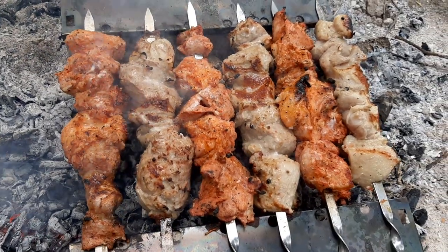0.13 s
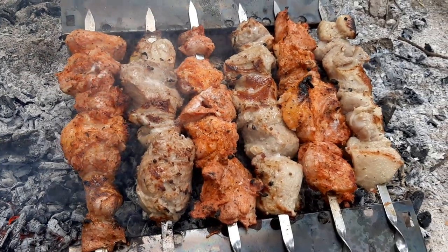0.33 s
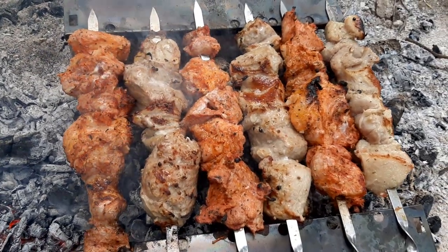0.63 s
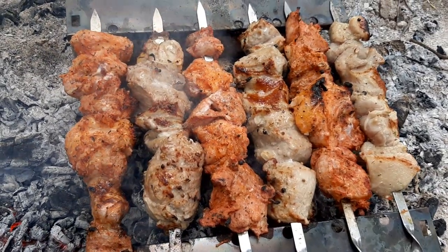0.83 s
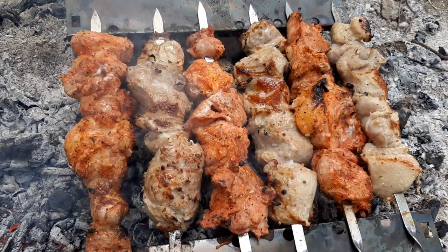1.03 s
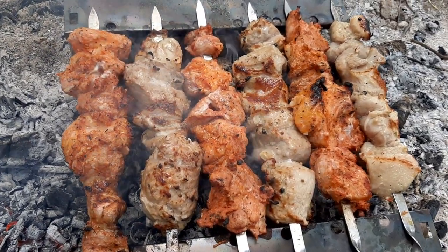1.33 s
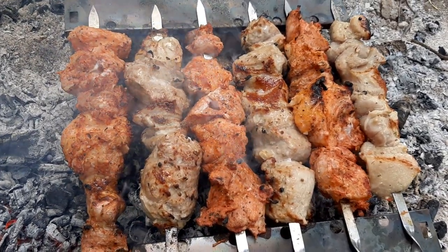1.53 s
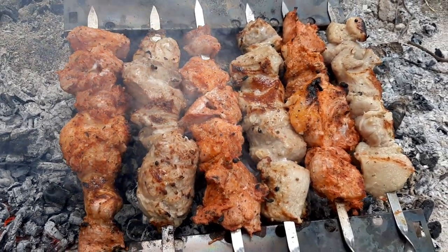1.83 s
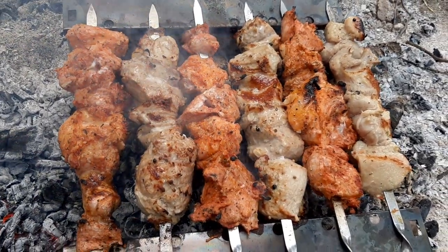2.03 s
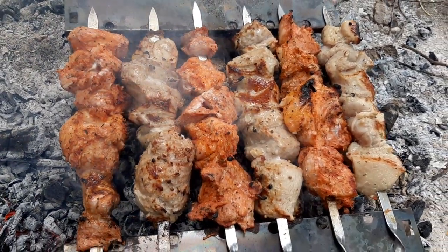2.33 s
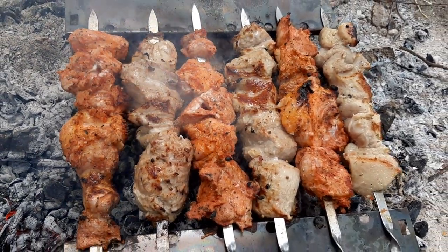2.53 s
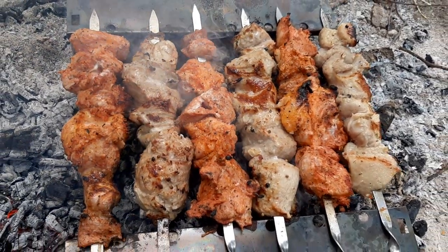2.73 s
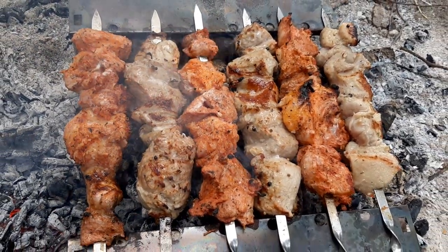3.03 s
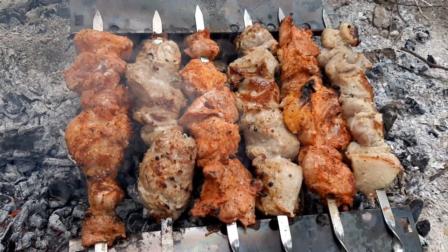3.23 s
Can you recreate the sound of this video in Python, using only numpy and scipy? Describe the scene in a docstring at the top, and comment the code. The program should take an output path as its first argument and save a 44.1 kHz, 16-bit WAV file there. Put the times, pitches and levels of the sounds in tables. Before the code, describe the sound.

A bright, fizzing sizzle of meat on a charcoal grill, dotted with sharp crackles.

```python
"""A bright, fizzing sizzle over a lower frying crackle: meat skewers on a charcoal grill outdoors.
Tiny fat bubbles burst at many spots, each with a click, and swell into a rush as juice meets the embers.
Droplets spit, coals snap, and drips land with a soft plop and boil off, over a faint low rumble of air.
Early on there is one very brief, thin, high chirp, mostly on the right.
Two small microphones close by pick it all up, and their openings ring at certain pitches."""
import sys
import numpy as np
from scipy import signal
from scipy.io import wavfile

SR = 44100
rng = np.random.default_rng(int(sys.argv[2]) if len(sys.argv) > 2 else 0)


def bounce(signal):
    """Save signal as a 16-bit WAV file at the path given by the first command-line argument."""
    frames = np.transpose(np.atleast_2d(signal))
    limited = np.clip(frames, -1, 1)
    pcm = np.round(limited * 32767).astype(np.int16)
    wavfile.write(sys.argv[1], SR, pcm)


N = 149499
HZ = np.fft.rfftfreq(4096, 1 / SR)  # the frequencies at which every tone curve is given


def sizzle():
    """Bursting fat bubbles make a fine fizz, a coarser frying sound and a few larger ticks."""
    # how the fizz swells and moves (time [s], relative level [dB], extra level on the left [dB])
    fizz_swells = [(0, -54.5, 2), (.17, -56, 3), (.25, -49.5, 5), (.4, -47, 3), (.46, -50, 4),
                   (.55, -46.5, 3), (.66, -44.5, 4.5), (.77, -46, 4.5), (.9, -49, 4), (1.07, -51.5, 2.5),
                   (1.28, -46.5, 1.5), (1.4, -48.8, 1.5), (1.7, -50.5, 2), (1.95, -50, 3.5), (2.15, -52, 5),
                   (2.23, -43.3, 2), (2.35, -42.8, 1.5), (2.48, -45.3, 3.5), (2.66, -49.5, 2),
                   (2.83, -48.3, 1.5), (2.97, -51, 2.5), (3.13, -50.5, 3), (3.21, -47, 4), (3.39, -49.5, 5)]
    # how the frying and the ticks swell (time [s], relative level [dB])
    fry_swells = [(0, -58.5), (.19, -61), (.27, -55), (.46, -58.5), (.62, -54), (.78, -54.5), (.9, -56),
                  (1.1, -59), (1.2, -52.5), (1.47, -54.5), (1.7, -55), (1.9, -57), (2.14, -56), (2.28, -50),
                  (2.5, -52), (2.66, -55), (2.83, -54), (2.95, -57.5), (3.1, -57), (3.22, -50.5),
                  (3.39, -56.5)]
    # tone of the fizz, the frying and the ticks (frequency [Hz], gain [dB])
    fizz_tone = [(500, -22.5), (2000, -17.5), (5000, -4.5), (9000, -4), (11500, 2), (13000, -0.5),
                 (16000, 2.5)]
    fry_tone = [(150, -16), (400, -9.5), (700, -9), (1100, -5), (2000, -1), (4000, 0), (8000, 0),
                (11000, -2), (16000, -4)]
    tick_tone = [(300, -19.5), (1200, -10.5), (3500, -0.5), (8000, 0.5), (12000, -1), (16000, -0.5)]
    t = np.arange(N) / SR
    times, level_db, side_db = np.transpose(fizz_swells)
    fizz = bubbles(per_s=14000, size_db=3.5, clump_db=6, clump_s=0.0063, lag_ms=0.39)
    fizz = unit(colour(fizz, spectrum(fizz_tone)))
    fizz *= amp(np.interp(t, times, level_db) - 4.5)
    fizz *= pan(np.interp(t, times, side_db) - 3.5)
    fry = bubbles(per_s=8000, size_db=2.5, clump_db=5, clump_s=0.012, lag_ms=0.3287)
    fry = unit(colour(fry, spectrum(fry_tone)))
    ticks = bubbles(per_s=130, size_db=3, clump_db=4, clump_s=0.039, lag_ms=0.39, spots=5)
    ticks = amp(-6) * unit(colour(ticks, spectrum(tick_tone)))
    fry_gain = amp(np.interp(t, *np.transpose(fry_swells)) - 1.5)
    return fizz + (fry + ticks) * fry_gain


def bubbles(per_s, size_db, clump_db, clump_s, lag_ms, spots=10):
    """Clicks of random size at several spots, like bursting bubbles; each spot can sputter in clumps."""
    out, t = np.zeros((2, N)), np.arange(N) / SR
    for place in np.linspace(-1, 1, spots):
        clumps = np.clip(rng.standard_normal(4096), -2, 2)
        sputter = np.interp(t / clump_s, np.arange(len(clumps)), clumps)
        size = np.minimum(rng.exponential(1, N), 4)  # many small, few large
        signs = rng.choice([-1, 1], N)
        bursts = rng.random(N) < per_s / spots / SR
        clicks = bursts * signs * amp(size_db * size + clump_db * sputter)
        out += signal.oaconvolve(clicks[None], path(lag_ms + 0.011 * place), axes=1)[:, :N]
    return out


def fat_spits():
    """Single droplets of fat spit with a bright crack."""
    # droplets (time [s], strength [dB], left minus right [dB], delay at the left microphone [ms])
    spits = [(0.0924, -38, 2, 0.22), (0.235, -33, 4, .25), (.3543, -36, 3, .43), (0.374, -31, 6, .54),
             (.4126, -24.5, 0, 0.11), (0.502, -27, 3, .45), (.521, -34, 3, .52), (0.5341, -26, -5, .56),
             (0.6088, -25, 4, .48), (.639, -30, -9, .5), (0.6424, -26, 11, .12), (0.65, -22, -4, 0.76),
             (0.6982, -24, 1, .56), (0.7674, -25, 5, 0.67), (0.7764, -25, -4, .56), (0.8297, -28, 5, .45),
             (0.9316, -30, -9, .56), (.967, -28.5, -8, .54), (1.018, -34, -3, .43),
             (1.0314, -28.5, -3, 0.4), (1.3033, -30, -16, 0.51), (1.4826, -28.5, -7, -0.127),
             (1.492, -40, 0, 0.26), (1.7422, -21.5, -3, .41), (1.9312, -31, 2, .41),
             (2.219, -26.5, 13, -.07), (2.503, -24, 0, .2), (2.8377, -28, 4, 0.11),
             (2.9533, -30, -13, 0.54), (3.0083, -24, 1, .39), (3.1414, -29, -4, .18),
             (3.3553, -38, -2, .27)]
    # tone of a spit (frequency [Hz], gain [dB])
    spit_tone = [(300, -15.5), (1500, -19), (4000, -11), (8000, -9), (12000, -1), (16000, -6)]
    out = np.zeros((2, N))
    for start, db, side_db, lag_ms in spits:
        add(out, start, crack(db, spectrum(spit_tone), side_db, lag_ms, splutter_db=3))
    return out


def coal_snaps():
    """The charcoal snaps with a duller, woody crack."""
    # snaps (time [s], strength [dB], centre [Hz], half width [octaves], left minus right [dB])
    snaps = [(0.0295, -31, 3150, 0.81, 5.5), (0.2359, -30.5, 5000, 1.8, 8), (0.8398, -30, 4030, 1.3, 3),
             (0.9529, -34, 3800, 0.6, 4), (1.184, -33, 1990, 1.5, 1), (1.2195, -28.5, 3000, 0.92, -9),
             (1.2766, -27, 3000, 1.3, -7), (1.4396, -28.5, 3580, 1.4, -1), (1.4807, -28, 3500, 1.8, -10),
             (1.5874, -23.5, 3240, 0.9, 3.5), (1.7303, -30, 6000, 1.7, -2), (1.8496, -33, 3460, 0.61, 9),
             (1.879, -33, 4500, 0.9, -2), (2.043, -33, 4000, 1.9, 5.5), (2.0984, -40, 4000, 1.3, 11),
             (2.31, -36, 1190, 0.53, -15), (2.743, -20, 1460, 1.62, -1.5), (2.8099, -31, 2200, 1.5, 1),
             (2.8352, -27, 3500, 1, 3), (3.0101, -25.5, 6500, .9, 1), (3.2154, -29, 3530, 1.2, 0),
             (3.3554, -35, 3500, 0.96, -3)]
    out = np.zeros((2, N))
    for start, db, hz, octaves, side_db in snaps:
        tone = np.maximum(hump(hz, octaves), -23)  # this floor leaves a broad knock under the snap
        add(out, start, crack(db, tone, side_db, lag_ms=0.13, splutter_db=-3))
    return out


def crack(db, tone_db, side_db, lag_ms, splutter_db):
    """One sharp click with a quickly fading splutter behind it."""
    t = np.arange(512) / SR
    splutter = rng.choice([-1, 1], len(t)) * np.exp(-t / 0.0009)
    burst = (t == 0) + amp(splutter_db) * (t > 0) * splutter / np.linalg.norm(splutter)
    click = colour(signal.oaconvolve(path(lag_ms), burst[None], axes=1), tone_db)
    return click / np.linalg.norm(click, axis=1, keepdims=True) * amp(db) * pan(side_db)


def chirp_and_boils():
    """First a very brief, thin chirp near 9 kHz, mostly on the right; later, drips boil on the embers."""
    # swells of hiss: the chirp in the first row, then the drips (peak time [s], level [dB], rise [s],
    # fade [s], centre [Hz], half width [octaves], left minus right [dB])
    swells = [(0.565, -46, .0015, 0.0017, 8950, .11, -17), (1.2, -68.5, 0.068, 0.14, 1300, 0.26, 0.5),
              (1.48, -70, .05, 0.021, 1220, 0.22, 2), (2.31, -52.5, 0.049, 0.11, 6260, 0.36, -4),
              (2.33, -62, 0.059, 0.059, 1064, 0.25, 1), (3.215, -52.5, 0.025, 0.039, 3100, 1, 3)]
    out, t = np.zeros((2, N)), np.arange(N) / SR
    hiss = bubbles(per_s=11000, size_db=3.5, clump_db=0, clump_s=0.0037, lag_ms=0.187, spots=8)
    for peak, db, rise, fade, hz, octaves, side_db in swells:
        swell = np.exp(-np.maximum((peak - t) / rise, (t - peak) / fade))
        out += unit(colour(hiss, hump(hz, octaves))) * swell * amp(db) * pan(side_db)
    return out


def drip_plops():
    """A falling drip lands with a short, soft, low note."""
    # landings (time [s], level [dB], pitch [Hz], length [s])
    plops = [(1.70, -68, 121, 0.043), (2.162, -55, 184, 0.017)]
    out = np.zeros((2, N))
    for start, db, hz, length in plops:
        t = np.arange(0, length, 1 / SR)
        swell = np.sin(np.pi * t / length) ** 2
        add(out, start, amp(db) * swell * np.sin(2 * np.pi * hz * t) * pan(0))
    return out


def outdoor_rumble():
    """Faint low noise of the open air, mostly shared by both microphones, with one soft gust."""
    # tone of the air (frequency [Hz], gain [dB])
    air_tone = [(15, -28), (30, -20), (45, -9), (62, 1), (100, -0.5), (180, -5), (260, -10), (500, -17.5),
                (1000, -15.5), (4000, -46.5)]
    shared, own = rng.standard_normal(N), rng.standard_normal((2, N))
    likeness = 0.61  # 1 would make both sides the same
    air = colour(np.sqrt(likeness) * shared + np.sqrt(1 - likeness) * own, spectrum(air_tone))
    gust_s, gust_length_s, gust_db = 2.46, 0.1, 5
    gust = np.exp(-((np.arange(N) / SR - gust_s) / gust_length_s) ** 2)
    return unit(air) * pan(-0.5) * amp(-75.5 + gust_db * gust)


def path(lag_ms):
    """How a click on the grill reaches both microphones; a positive lag makes the left one late."""
    t = np.arange(2048) / SR
    out = np.zeros((2, len(t)))
    for side, delay_ms in enumerate([max(lag_ms, 0), max(-lag_ms, 0)]):
        age = t - delay_ms / 1000
        out[side] = np.sinc(age * SR)  # the direct click
        for fade_s, db in (0.0007, -5), (0.006, -10):  # nearby bounces, then the tray's echo
            echo = rng.standard_normal(len(t)) * np.exp(-abs(age) / fade_s) * (age > 0)
            out[side] += amp(db) * echo / np.linalg.norm(echo)
    return out


def amp(db):
    """Turns decibels into a gain."""
    return 10 ** (np.asarray(db) / 20)


def unit(x):
    """Scales a sound to an average power of one."""
    return x / np.sqrt(np.mean(x ** 2) + 1e-20)


def pan(db):
    """Left and right gains; positive decibels favour the left."""
    return amp(np.array([[0.5], [-0.5]]) * db)


def add(mix, start_s, sound):
    """Adds a stereo sound to the mix at a given time."""
    part = mix[:, max(round(start_s * SR), 0):][:, :sound.shape[1]]
    part += sound[:, :part.shape[1]]


def spectrum(points):
    """Joins (frequency [Hz], gain [dB]) points into a tone curve."""
    hz, db = np.transpose(points)
    return np.interp(np.log(HZ + 1), np.log(hz + 1), db)


def hump(hz, octaves):
    """A tone curve in dB that keeps one band around a centre frequency."""
    distance = abs(np.log2((HZ + 1) / hz) / octaves)
    return np.maximum(-10 * np.log10(1 + distance ** 6), -80)


def colour(x, db):
    """Shapes a sound with a tone curve; it rings only after a click, so the start stays sharp."""
    log_gain = np.log(amp(np.r_[db, db[-2:0:-1]]))
    ring = np.fft.ifft(np.exp(np.conj(signal.hilbert(log_gain)))).real[:len(HZ)]
    return signal.oaconvolve(x, ring[None], axes=1)[:, :x.shape[1]]


def scene():
    """The grill and the air around it."""
    return sizzle() + chirp_and_boils() + fat_spits() + coal_snaps() + drip_plops() + outdoor_rumble()


def record(dry):
    """Each microphone's opening rings at its own pitches; then the highest treble is cut."""
    # tone of the left and right openings (frequency [Hz], gain [dB])
    left_tone = [(300, 1.5), (750, -5.5), (1000, -3), (1230, -1), (1500, 10), (1680, 2), (1850, 6),
                 (2040, 11), (2250, 1.5), (2600, 2.5), (2850, -5), (3250, -2.5), (3650, 7.5), (4050, 8),
                 (4500, 2.5), (5300, 5), (6800, 0.5), (7900, 9), (8600, -7.5), (10000, -1), (11000, 2),
                 (11700, 10.5), (12800, 13), (14000, 13), (15600, 14.5)]
    right_tone = [(300, -2), (750, -6.5), (1380, -7.5), (1520, -4), (1720, -15.5), (2030, -3.5),
                  (2200, -18), (2700, -7), (4000, -3), (5300, -0.5), (7000, 1), (7900, 4), (8600, -3.5),
                  (10000, 1.5), (11800, 7), (14000, 12), (15600, 6.5)]
    heard = np.vstack([colour(dry[:1], spectrum(left_tone)), colour(dry[1:], spectrum(right_tone))])
    treble_cut = signal.firwin(701, cutoff=15820, window=("kaiser", 8), fs=SR)
    return signal.oaconvolve(heard, treble_cut[None], "same")


dry = scene()
out = record(dry)
bounce(out)
```